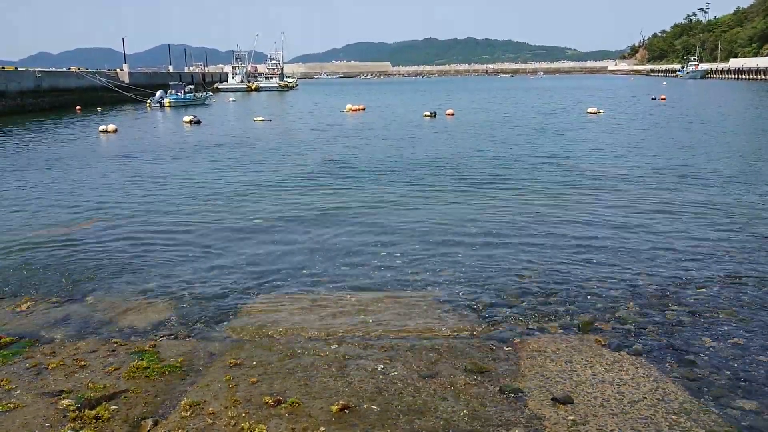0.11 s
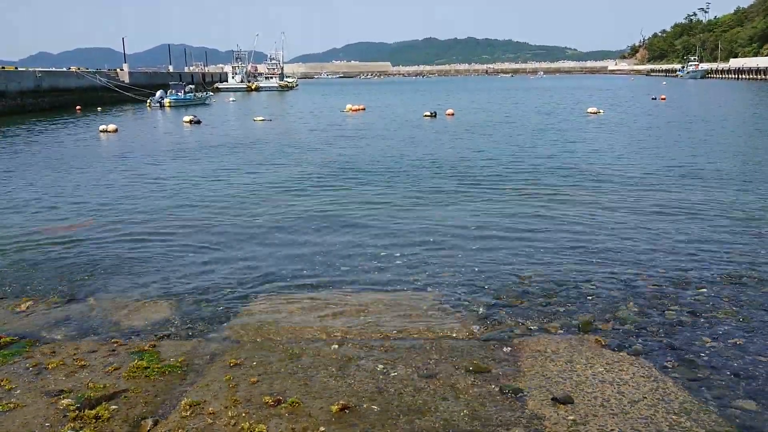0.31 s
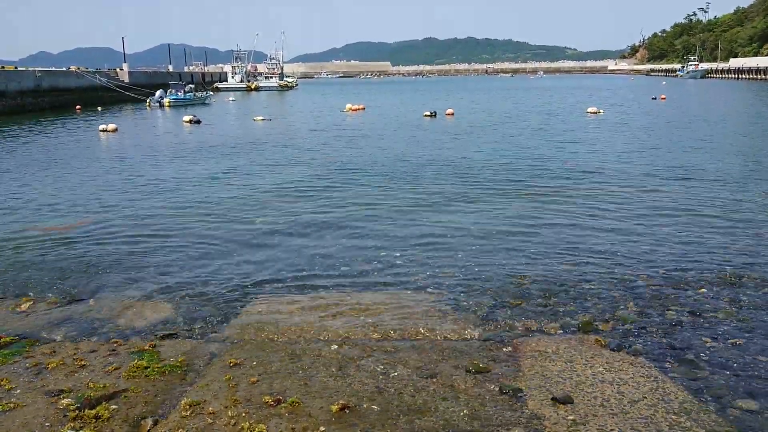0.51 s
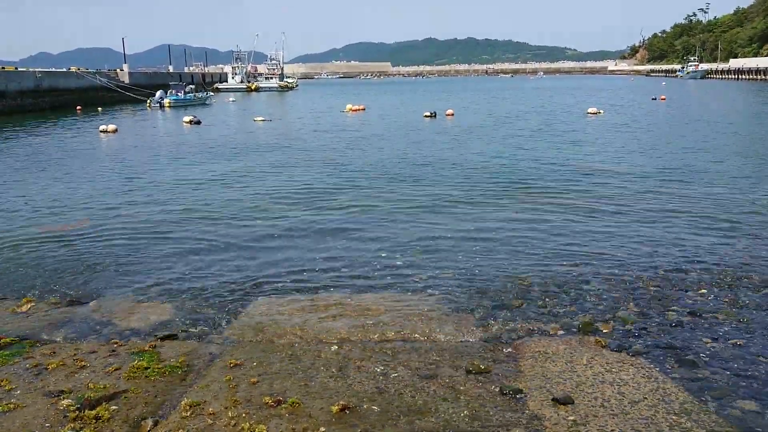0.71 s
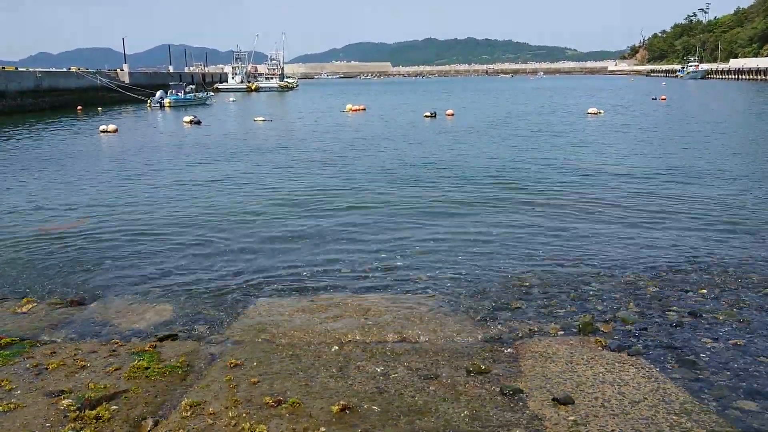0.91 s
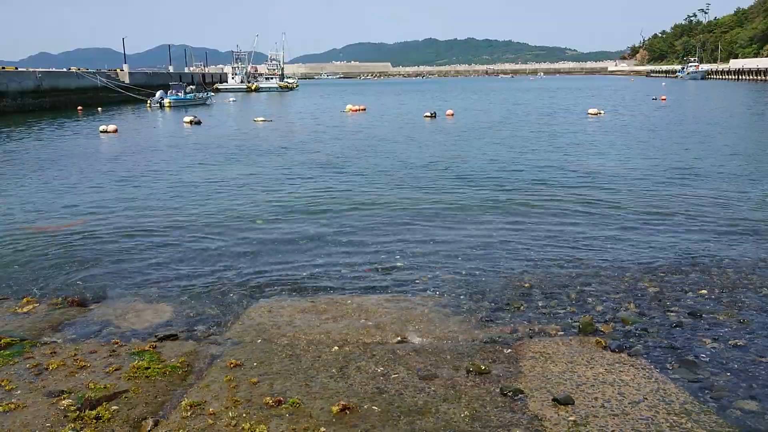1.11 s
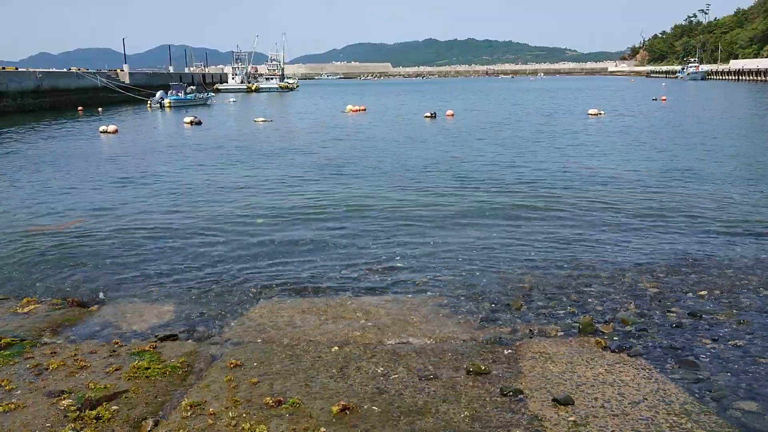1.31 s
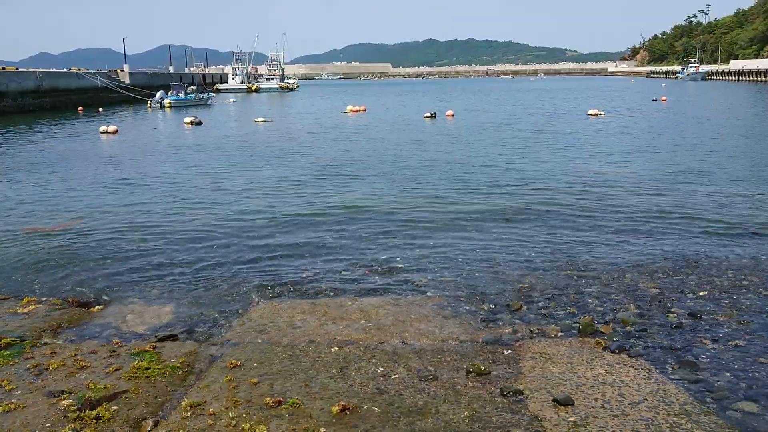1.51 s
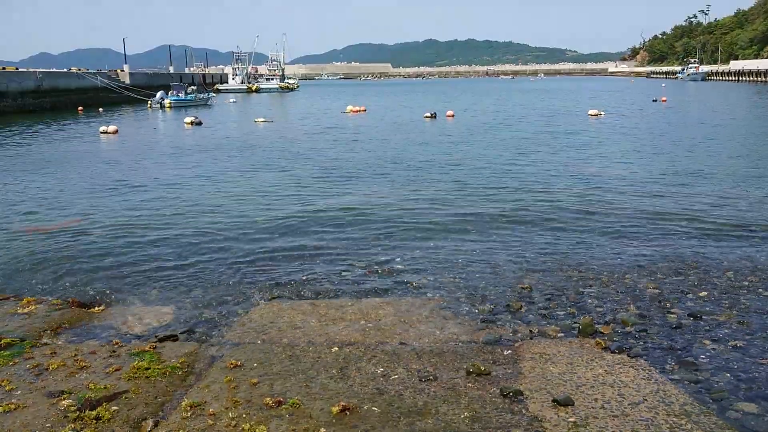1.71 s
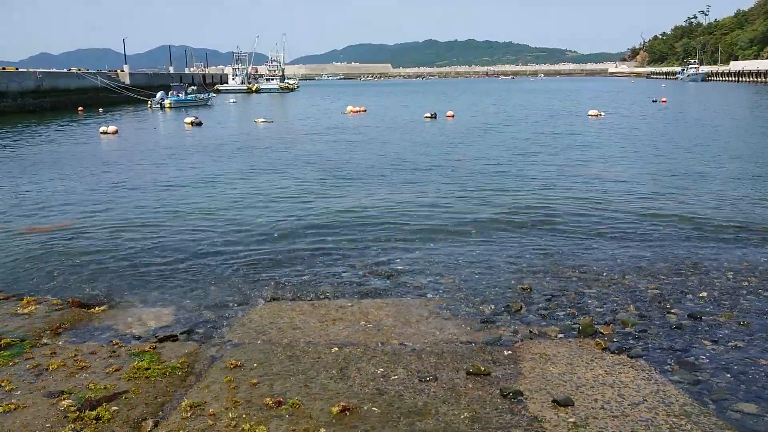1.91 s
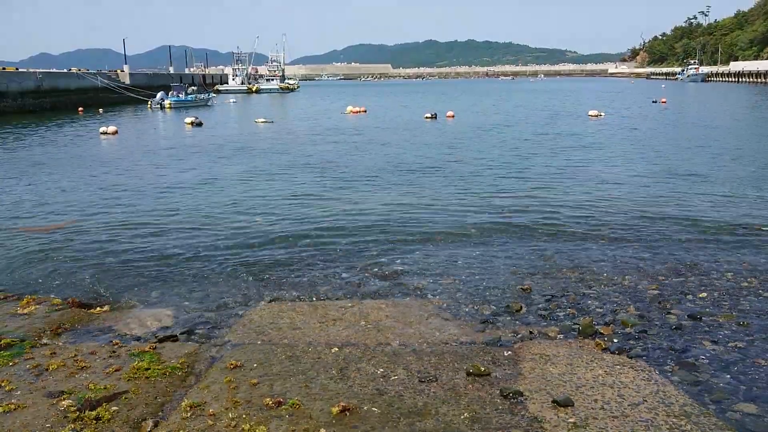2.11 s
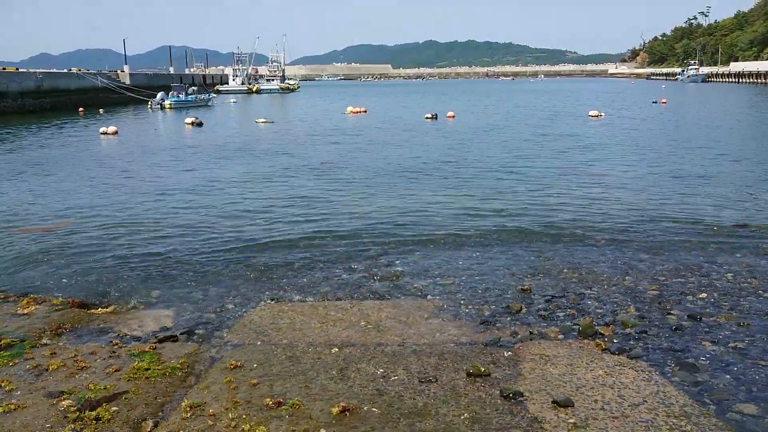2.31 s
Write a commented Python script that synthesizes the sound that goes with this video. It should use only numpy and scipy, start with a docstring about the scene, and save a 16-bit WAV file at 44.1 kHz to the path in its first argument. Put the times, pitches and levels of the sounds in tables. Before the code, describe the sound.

Small waves wash over a concrete slipway with fine fizz, plops and tiny bright bubble ticks, close and slightly left; a gust thumps and crackles on the stereo microphone in the first second, then eases.

```python
"""Wavelets and wind on a slipway

Small waves wash over a concrete slipway: a fizz of tiny bubbles and plops, a little to the left.
Every bubble is a dying sine of rising pitch; smooth noise fills in the wash behind them.
A gust buffets the two microphone ports separately with low thumps and spikes, then the wind eases.
The wind is low noise under short swells of power; a steady murmur of noise lies far behind."""
import sys
import numpy as np
from scipy import signal
from scipy.fft import rfft, irfft
from scipy.io import wavfile
from scipy.ndimage import uniform_filter1d

SR = 44100
rng = np.random.default_rng(int(sys.argv[2]) if len(sys.argv) > 2 else 0)


def log_audio(samples):
    """Write samples as a 16-bit WAV file to the path given in sys.argv[1]."""
    # one column per channel
    frames = np.atleast_2d(samples).T
    # limit to full scale, then quantise
    limited = np.clip(frames, -1, 1)
    pcm = np.round(limited * 32767).astype(np.int16)
    wavfile.write(sys.argv[1], SR, pcm)


def decibels_to_gain(level_db):
    """Convert a level in decibels to a linear amplitude gain (20 dB per decade)."""
    exponent = np.asarray(level_db, float) / 20
    return 10 ** exponent


N = 110250

# Level of the wave's wash, to which wash() adds 3 dB: time_s, gurgle_db, fizz_db
WASH_LEVELS = [(0, -61, -61.5), (.15, -56, -61.5), (.3, -57.5, -61.5), (.5, -53.5, -57), (.65, -55.5, -58),
               (.76, -51, -55), (.85, -53.5, -56), (1.0, -51.5, -55), (1.12, -51.5, -55), (1.23, -52, -54),
               (1.45, -52, -55), (1.65, -53, -55.5), (1.85, -53.5, -55.5), (2.0, -52.5, -56.5),
               (2.2, -53.5, -57), (2.35, -51.5, -54.5), (2.5, -51, -54.5)]
# Tone of the larger bubbles, as a filter: frequency_hz, gain_db
GURGLE_TONE = [(260, -33), (450, -16), (513, -11), (615, -1.5), (1210, -1.5), (1500, 2), (1710, 0),
               (2190, 1), (3200, -6), (4160, -21), (7040, -120)]
# Tone of the tiny bubbles, as a filter: frequency_hz, gain_db
FIZZ_TONE = [(1880, -30), (3200, -3.5), (3420, -4.5), (3800, -2.5), (4120, -4), (7600, -5.5),
             (11900, -13.5), (14500, -15.5), (15700, -11)]
# Lean of the wash to one side: frequency_hz, left_minus_right_db
WASH_TILT = [(60, 7.5), (130, 7.0), (290, 12), (640, 2.5), (1410, 1.0), (3100, 1), (6820, 5.5),
             (15000, 4.0)]
SEA_SHARE = 0.51  # share of the wash power given to smooth noise before the tone filter

# Single bubbles that stand out: start_s, level_db, pitch_hz, left_minus_right_db
PLOPS = [(0.3232, -39, 1800, 0), (0.375, -40, 2020, -5), (0.842, -33, 1510, -2), (0.8544, -35.5, 2310, 3),
         (0.8844, -35, 1980, -3), (0.9714, -45, 2050, 0), (1.0161, -42, 1820, 0.0),
         (1.1494, -43.5, 1027, 1.0), (1.282, -34.5, 1490, 1.0), (1.2964, -36, 1680, 1.5),
         (1.3483, -33.5, 2170, 1), (1.3714, -41.5, 917, 1.0), (1.6237, -40.5, 1050, -5),
         (1.8223, -37, 2090, 2.0), (1.8497, -38.5, 1480, 0.5), (1.9235, -44.5, 940, 0),
         (1.9694, -50, 930, 1.0), (2.0577, -36.5, 2200, -1), (2.0714, -35.5, 1430, 0),
         (2.0807, -29, 2080, 8.5), (2.1044, -43.5, 2600, 5), (2.1214, -46, 1150, -4),
         (2.3316, -32, 1516, 0.5), (2.4094, -35, 2000, 1)]
# Deeper glugs between the stones: start_s, level_db, pitch_hz, left_minus_right_db
GLUGS = [(0.218, -43.5, 820, -1), (0.966, -42.5, 1030, 5.0), (1.057, -46.5, 625, 2.0),
         (1.249, -46.5, 710, 3), (1.384, -45, 616, 2.5), (1.504, -46, 592, 2), (1.6, -49.5, 710, 5),
         (1.639, -53, 766, 1.0), (1.69, -55, 1110, 5.5), (1.748, -43, 754, 2), (1.8, -45.5, 880, 0),
         (1.864, -42, 760, 1.5), (1.884, -44, 1070, -0.5), (2.023, -44, 929, -2), (2.127, -44, 743, 0.5),
         (2.249, -47.5, 627, 2.5), (2.289, -42.5, 1160, 4), (2.43, -48, 574, 4.0)]
# Small bright bubbles: start_s, level_db, pitch_hz, left_minus_right_db
TICKS = [(0.3529, -37, 8840, 10), (0.5017, -41, 4900, 4.5), (0.5666, -48, 5580, 5.0),
         (0.704, -43, 4680, 6.8), (0.8533, -39, 5950, 5.5), (0.9428, -38, 5960, 5.5),
         (0.9906, -35, 5200, 5.0), (1.0181, -36, 6950, 4.6), (1.052, -32.5, 8100, 6),
         (1.1707, -67, 5640, 4.5), (1.2034, -34, 5870, 4.5), (1.2404, -31, 6070, 6.0),
         (1.28, -39, 7500, 5.0), (1.3286, -33, 7800, 6.5), (1.3493, -37, 7500, 5.0), (1.3807, -35, 6160, 4),
         (1.459, -40, 6140, 5.5), (1.4841, -33, 5020, 8.6), (1.5403, -33, 6900, 6.0),
         (1.6915, -38, 7590, 3.0), (1.7965, -44, 4500, 5.2), (1.8542, -34.5, 8200, 6.9),
         (2.0144, -46, 4640, 5.0), (2.0872, -44, 6150, 5.0), (2.115, -36, 8450, 4.5),
         (2.1284, -40, 6100, 3.5), (2.144, -47, 5800, 4.0), (2.18, -39, 6160, 5)]
PLOP_CYCLES, GLUG_CYCLES, TICK_CYCLES = 9.7, 13, 9.1  # ringing length in cycles
PITCH_RISE = 0.03  # fraction of the pitch gained per decay time
LEAD_S, LEAD_SPREAD_S = 0.00013, 0.00012  # how much earlier the left port hears a bubble

# Eddies hitting a port: centre_s, port (-1 left, 1 right), length_s, thump_db, flutter_db
EDDIES = [(0.051, 1, 0.007, -29, -33.5), (0.121, 1, 0.014, -29.5, -46), (0.196, 1, 0.0095, -24, -41),
          (0.218, -1, 0.0081, -21, -36), (0.232, 1, 0.0073, -15.5, -35.5), (0.235, -1, 0.017, -25.5, -48),
          (0.298, -1, 0.026, -26.5, -51), (0.325, -1, 0.0089, -16.5, -31.5), (0.361, 1, 0.0077, -19, -40),
          (0.392, 1, 0.044, -27.5, -36.5), (0.423, -1, 0.0088, -41, -26.5), (0.438, 1, 0.0072, -21, -25),
          (0.442, -1, 0.015, -13, -23), (0.457, 1, 0.013, -35, -35), (0.484, -1, 0.0084, -14.5, -22.5),
          (0.511, 1, 0.024, -29, -60), (0.514, -1, 0.0073, -16, -14.5), (0.543, -1, 0.021, -15.5, -25),
          (0.561, -1, 0.0065, -15, -19), (0.562, 1, 0.019, -29.5, -42), (0.595, -1, 0.0064, -19, -27.5),
          (0.596, 1, 0.011, -16, -32), (0.619, -1, 0.012, -12, -17.5), (0.638, 1, 0.0039, -37, -15.5),
          (0.667, 1, 0.04, -25.5, -42), (0.667, -1, 0.011, -39, -55), (0.687, 1, 0.016, -43, -23.5),
          (0.706, 1, 0.0087, -20, -25), (0.727, -1, 0.014, -19.5, -41), (0.737, 1, 0.009, -40, -27.5),
          (0.768, -1, 0.02, -10, -15), (0.793, -1, 0.01, -8.5, -35), (0.834, -1, 0.0046, -45, -48),
          (0.864, 1, 0.0053, -46, -31), (0.865, -1, 0.0074, -24.5, -56), (1.038, -1, 0.011, -25, -71),
          (1.096, 1, 0.0075, -42, -69), (1.114, 1, 0.0071, -17.5, -42), (1.207, 1, 0.0083, -25, -35),
          (1.721, -1, 0.024, -33.5, -64), (1.761, -1, 0.039, -38, -65), (1.814, -1, 0.027, -36.5, -58.5),
          (1.947, -1, 0.03, -30.5, -75), (2.095, -1, 0.025, -44, -52), (2.143, -1, 0.014, -37.5, -55),
          (2.236, -1, 0.024, -44, -68), (2.255, -1, 0.017, -31, -60), (2.301, -1, 0.011, -34.5, -64),
          (2.333, -1, 0.03, -35.5, -54), (2.382, -1, 0.025, -37.5, -54.5), (2.423, -1, 0.016, -37, -72),
          (2.453, -1, 0.0089, -32, -56), (2.47, -1, 0.015, -35, -65)]
# Wind between the buffets: time_s, left_db, right_db
BREEZE_LEVELS = [(0.0, -43, -49), (0.15, -46.5, -44), (0.29, -52, -43), (0.44, -30, -39), (0.59, -33, -33),
                 (0.74, -31.5, -37), (0.88, -37, -37.5), (1.03, -45, -37.5), (1.18, -47, -37),
                 (1.32, -47.5, -53.5), (1.47, -50, -57), (1.62, -42.5, -50), (1.76, -65, -54),
                 (1.91, -43, -52), (2.06, -47.5, -45), (2.2, -41, -60), (2.35, -53.5, -53), (2.5, -36, -50)]
# Tone of the deep rumble, as a filter: frequency_hz, gain_db
RUMBLE_TONE = [(15, -50), (30, -10), (48, -3.5), (68, 2.5), (100, -6), (140, -15.5), (200, -24.5),
               (400, -56)]
# Tone of the faster flutter, as a filter: frequency_hz, gain_db
FLUTTER_TONE = [(80, -4.5), (140, -4), (200, 7), (300, -2), (450, -12), (700, -23), (1100, -35.5),
                (2000, -57)]
FLUTTER_FOLLOWS, FLUTTER_DB = 1.39, -1.5  # flutter dB per dB of breeze, and offset in dB
FLUTTER_SPREAD = 1.095  # flutter length against the thump
BREEZE_SWING_DB = 2.0  # rms swing of the breeze level
EVENNESS = 0.9  # 0 leaves the swells of the turbulence, 1 flattens them

# Sharp pressure spikes of the gust: centre_s, port (-1 left, 1 right), level_db, width_s
PRESSURE_SPIKES = [(0.217, -1, -22, 0.0012), (0.23, 1, -12.5, 0.0013), (0.419, -1, -43, 0.00099),
                   (0.49, -1, -12.5, 0.00042), (0.513, -1, -5, 0.00099), (.559, -1, -16.5, 0.0004),
                   (.613, -1, -9.5, 0.0004), (.639, 1, -9, 0.00024), (0.684, 1, -14, 0.00047),
                   (0.691, 1, -19, .0007), (0.746, -1, -12, 0.00068), (0.755, -1, -11, 0.00043),
                   (0.766, -1, -7, 0.00076), (0.63, -1, -6.5, 0.004), (.546, -1, -24, 0.00048),
                   (0.648, 1, -16.5, 0.00029), (0.706, 1, -17, 0.00051), (.432, 1, -19, 0.00048),
                   (0.842, -1, -18, 0.00096), (0.862, 1, -14.5, 0.00097)]

# Tone of the open harbour's low murmur, as a filter: frequency_hz, gain_db
MURMUR_TONE = [(80, 3), (150, -13.5), (250, -5.5), (350, -15.5), (450, -50.5), (700, -32)]
MURMUR_DB = -61.5  # rms level


def rms_one(x):
    """Scale to an rms of 1 over all channels together."""
    return x / np.sqrt(np.mean(x ** 2) + 1e-20)


def in_time(rows):
    """Draw a table's curves out to every sample."""
    s, *columns = np.transpose(rows)
    return np.array([np.interp(np.arange(N) / SR, s, c) for c in columns])


def bins():
    """Frequencies of the spectrum bins in Hz."""
    return np.arange(N // 2 + 1) * SR / N


def at_hz(points, hz):
    """Read a tone curve on a log-frequency axis."""
    point_hz, point_db = np.transpose(points)
    return np.interp(np.log(hz + 1), np.log(point_hz), point_db)


def coloured(x, db):
    """Filter by a gain in dB for each spectrum bin."""
    return irfft(rfft(x) * decibels_to_gain(db), N)


def drift(rate):
    """Slow random swing for each channel, rms 1: noise through a two-pole low-pass at rate Hz."""
    step = 40  # samples between slow values
    r = np.exp(-2 * np.pi * rate * step / SR)
    noise = rng.standard_normal((2, N // step + 2002))
    slow = signal.lfilter([1], [1, -2 * r, r * r], noise)[:, 2000:]  # skip the run-in
    return np.array([np.interp(np.arange(N) / step, np.arange(len(v)), rms_one(v)) for v in slow])


def bubbles(s, db, hz, pan_db, cycles, size):
    """Each bubble is a dying sine that rises in pitch, on average a little earlier on the left."""
    out = np.zeros((2, N + size))
    lead = LEAD_S + LEAD_SPREAD_S * rng.standard_normal(len(s))
    first = np.clip(s * SR, 0, N - 1).astype(int)
    where = first[:, None] + np.arange(size)
    for side, sign in enumerate([1, -1]):
        # a 0.6 ms pause leaves room for the lead
        t = np.maximum(np.arange(size) / SR - 0.0006 + sign * lead[:, None] / 2, 0)
        age = t * (hz / cycles)[:, None] * 3  # in decay times: three to the ringing length
        tone = np.sin(2 * np.pi * hz[:, None] * t * (1 + PITCH_RISE * age / 2))
        envelope = 1.73 * age ** 0.61 * np.exp(-age)
        wave = tone * envelope * decibels_to_gain(db + sign * pan_db / 2)[:, None]
        out[side] = np.bincount(where.ravel(), wave.ravel(), N + size)
    return out[:, :N]


def smooth_sea():
    """Noise that is alike at the two ports in the bass and unrelated in the treble."""
    white = rng.standard_normal((3, N))
    shared_bass = coloured(white[0], -20 * np.log10(1 + (bins() / 1100) ** 4))
    own_bass = coloured(white[1:], -20 * np.log10(1 + (bins() / 800) ** 4))
    return white[1:] - own_bass + shared_bass


def wash(level_db, tone, low_hz, high_hz, cycles, spread_db, clump_db, count, size):
    """Random bubbles and smooth noise swell together in clumps, then take on the tone and tilt."""
    s, u, pan = rng.random((3, count))
    hz = low_hz * (high_hz / low_hz) ** u
    db = spread_db * np.minimum(rng.exponential(1, count), 4) + 20 * np.log10(hz / 1000)
    grains = rms_one(bubbles(s * N / SR, db, hz, 5.1 * (pan - 0.5), cycles, size))
    edge = -200 * ((bins() < low_hz) | (bins() > high_hz))
    grains = rms_one(coloured(grains, edge))
    sea = rms_one(coloured(smooth_sea(), edge))
    mix = np.sqrt(1 - SEA_SHARE) * grains + np.sqrt(SEA_SHARE) * sea
    # one swing common to both ports, and a faster one for each
    mix = mix * decibels_to_gain(clump_db * (drift(10.4)[0] + 1.28 * drift(23.0)))
    tilt = np.outer([0.5, -0.5], at_hz(WASH_TILT, bins()))
    return decibels_to_gain(level_db + 3.0) * rms_one(coloured(mix, at_hz(tone, bins()) + tilt))


def water():
    """Gurgle of larger bubbles, fizz of small ones, and the single plops, glugs and ticks."""
    gurgle_db, fizz_db = in_time(WASH_LEVELS)
    gurgle = wash(gurgle_db, GURGLE_TONE, 400, 3400, 13.0, spread_db=3.5, clump_db=0.4,
                  count=2200, size=1100)
    fizz = wash(fizz_db, FIZZ_TONE, 3100, 15520, 9.0, spread_db=4.0, clump_db=0.99,
                count=6000, size=250)
    plops = bubbles(*np.transpose(PLOPS), PLOP_CYCLES, size=1300)
    glugs = bubbles(*np.transpose(GLUGS), GLUG_CYCLES, size=2000)
    ticks = bubbles(*np.transpose(TICKS), TICK_CYCLES, size=300)
    return gurgle + fizz + plops + glugs + ticks


def turbulence(tone):
    """Unrelated low noise at each port, its swells partly evened."""
    tone_db = at_hz(tone, bins())
    x = rms_one(coloured(rng.standard_normal((2, N)), tone_db))
    swell = np.sqrt(uniform_filter1d(np.abs(signal.hilbert(x)) ** 2, size=200))
    even = x / (swell + 0.017) ** EVENNESS
    # trim what the evening adds far outside the tone
    return rms_one(coloured(even, np.minimum(tone_db + 25, 0)))


def wind():
    """Breeze and buffeting eddies set the power of a deep rumble and of a faster flutter."""
    breeze_db = in_time(BREEZE_LEVELS) + BREEZE_SWING_DB * drift(13.0)
    rumble_power = decibels_to_gain(2 * breeze_db)
    flutter_power = decibels_to_gain(2 * (FLUTTER_FOLLOWS * breeze_db + FLUTTER_DB))
    t = np.arange(N) / SR
    for s, port, length, thump_db, flutter_db in EDDIES:
        side = int(port > 0)
        thump = np.exp(-3.7 * ((t - s) / length) ** 2)
        flutter = np.exp(-3.7 * ((t - s) / (length * FLUTTER_SPREAD)) ** 2)
        rumble_power[side] += decibels_to_gain(2 * thump_db) * thump
        flutter_power[side] += decibels_to_gain(2 * flutter_db) * flutter
    rumble = np.sqrt(rumble_power) * turbulence(RUMBLE_TONE)
    return rumble + np.sqrt(flutter_power) * turbulence(FLUTTER_TONE)


def spikes():
    """Each spike is a narrow bump of pressure between two shallow dips."""
    out, t = np.zeros((2, N)), np.arange(N) / SR
    for s, port, db, width in PRESSURE_SPIKES:
        bump = ((t - s) / width) ** 2
        out[int(port > 0)] += decibels_to_gain(db) * (np.exp(-bump / 2) - 0.19 * np.exp(-bump / 12.0))
    return out


def murmur():
    """Steady low noise, half alike at the two ports."""
    white = rng.standard_normal((3, N))
    return decibels_to_gain(MURMUR_DB) * rms_one(coloured(white[1:] + white[0], at_hz(MURMUR_TONE, bins())))


def scene():
    """Water, wind and pressure spikes on the ports, and the far murmur."""
    return water() + wind() + spikes() + murmur()


def low_pass(x):
    """Removes everything above the highest recorded frequency."""
    return signal.sosfilt(signal.butter(12, 15850, fs=SR, output="sos"), x)


def record(dry):
    """The recorder cuts the deepest bass and the top."""
    bass_cut = signal.butter(4, 45, "high", fs=SR, output="sos")
    top_cut = signal.cheby2(12, 60, 16500, fs=SR, output="sos")
    mix = signal.sosfilt(top_cut, signal.sosfilt(bass_cut, dry))
    return low_pass(mix)


dry = scene()
out = record(dry)
log_audio(out)
```